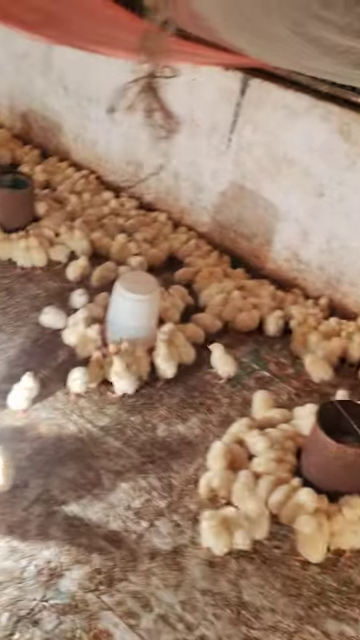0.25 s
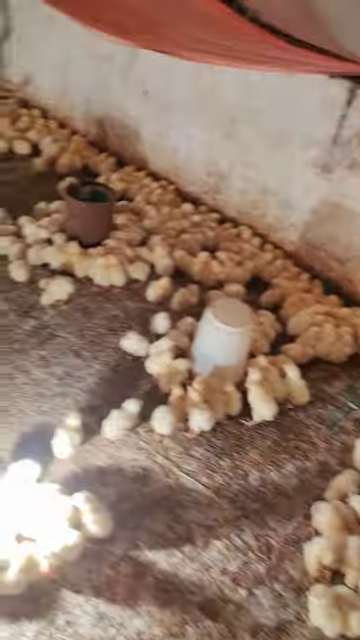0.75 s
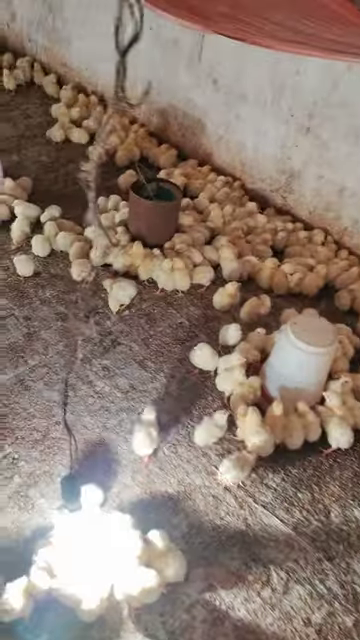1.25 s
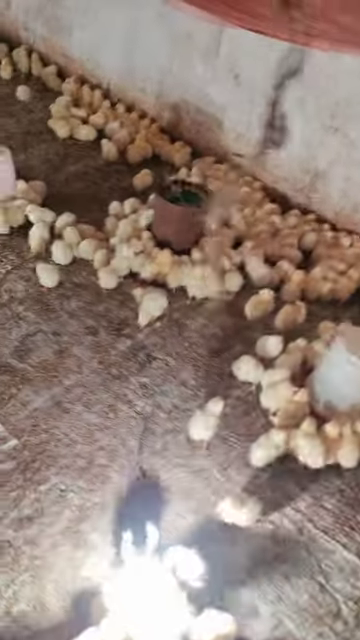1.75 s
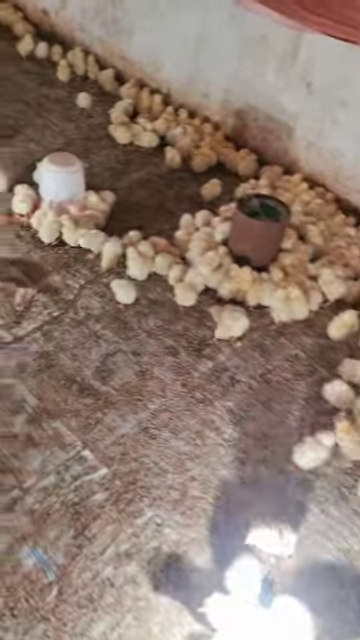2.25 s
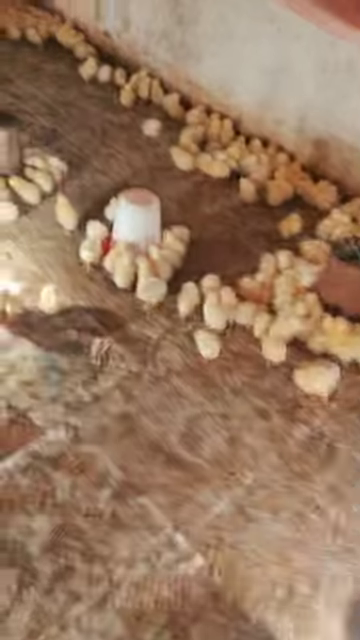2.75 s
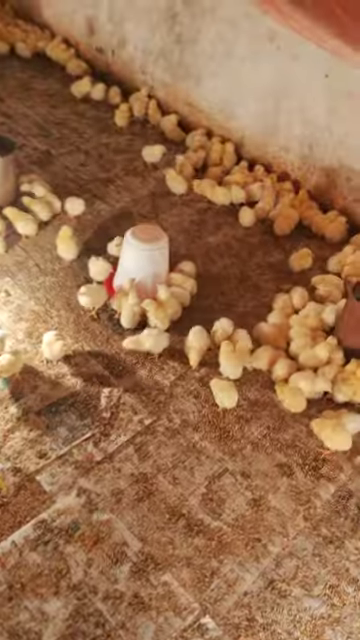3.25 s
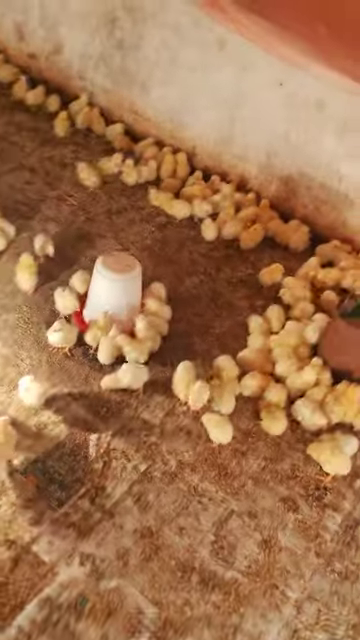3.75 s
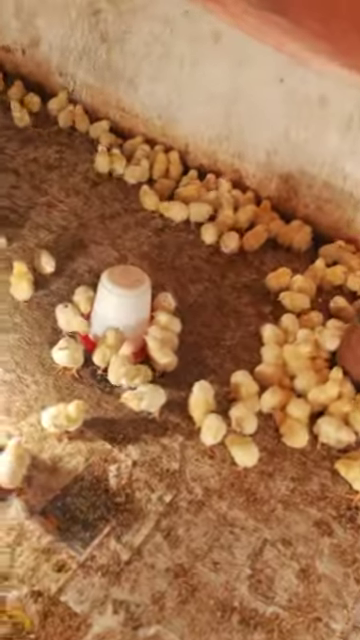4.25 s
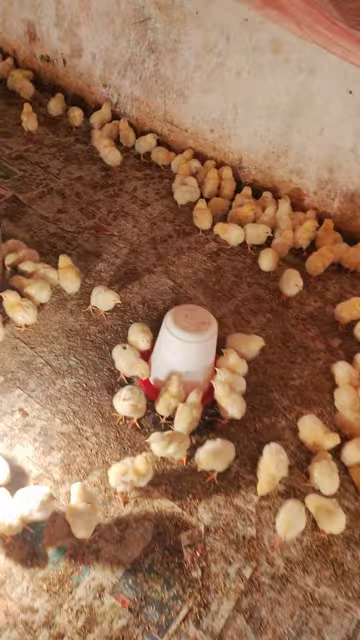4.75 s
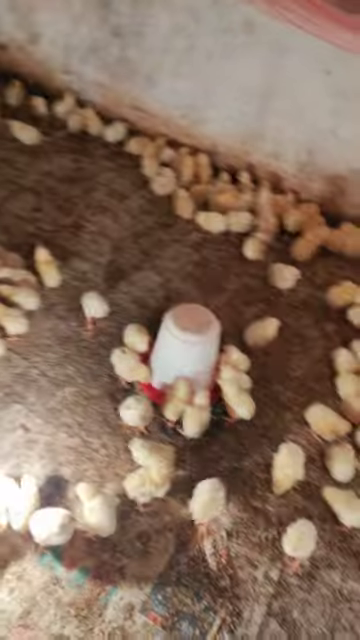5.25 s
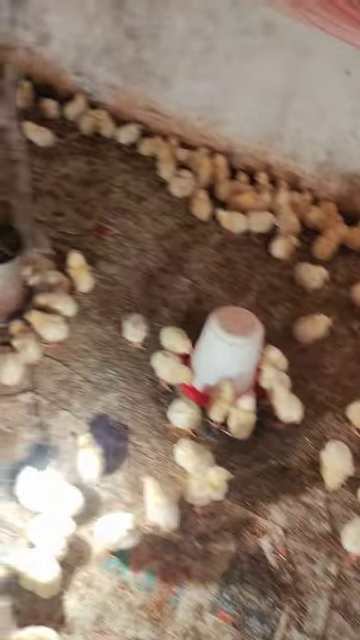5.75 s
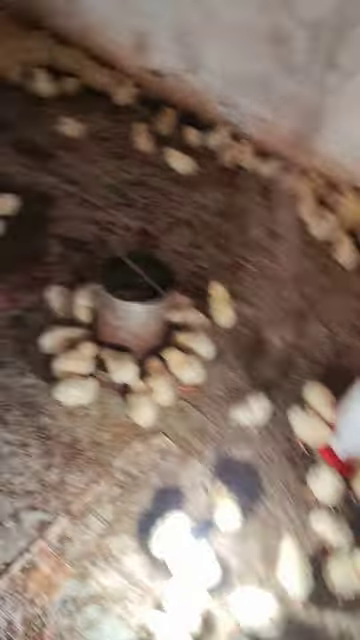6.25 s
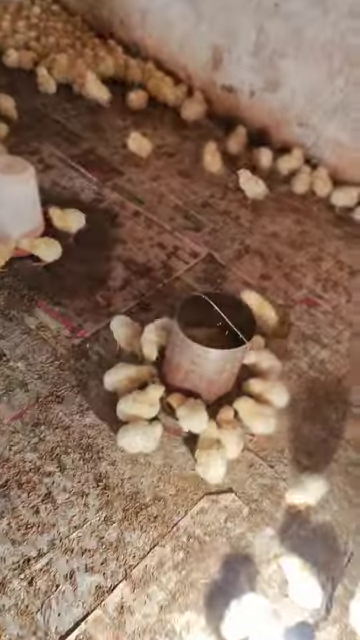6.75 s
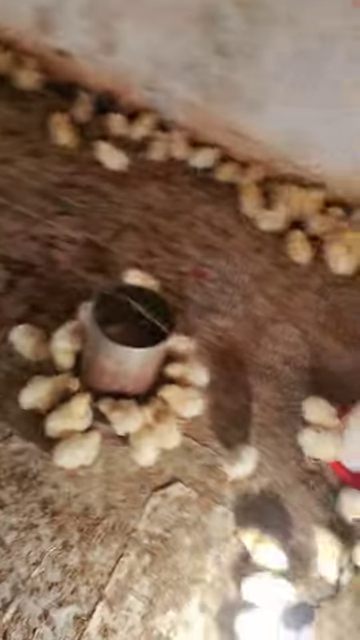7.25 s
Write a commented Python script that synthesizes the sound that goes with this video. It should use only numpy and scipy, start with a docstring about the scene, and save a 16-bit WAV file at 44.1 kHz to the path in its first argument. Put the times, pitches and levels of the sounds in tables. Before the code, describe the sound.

Young chicks cheep without a break, far ones blurred by hard walls, near ones sharp and slightly left. Early calls are soft and scattered; from about two seconds a single chick cries repeatedly, loudest between four and six seconds, then a little weaker. Faint tapping, a few dry ticks, dull floor scuffs and hissing cloth lie underneath, heard on a phone carried through the shed.

```python
"""Hundreds of young chicks peep in a plastered shed, heard close up on a phone with two microphone ports.
One chick's falling cries stand out; they grow strongest past the middle of the scene and then ease.
Each call is a gliding whistle that reaches the ports directly and by bounces off floor and walls.
Under it lie a low room noise, light pecks, a few ticks and scuffs, and clothing that rustles at each stride."""
import sys
import numpy as np
from scipy import signal
from scipy.fft import rfft, irfft, next_fast_len
from scipy.io import wavfile

SR = 44100
rng = np.random.default_rng(int(sys.argv[2]) if len(sys.argv) > 2 else 0)


def unload_wav(signal):
    """Save mono or channel-first audio to the path in sys.argv[1] as 16-bit WAV at rate SR, clipped to [-1, 1]."""
    wavfile.write(
        sys.argv[1],
        SR,
        np.round(np.clip(np.atleast_2d(signal).T, -1, 1) * 32767).astype(np.int16),
    )


N = 330309
T = np.arange(N) / SR
ARCH_TOP = .4  # share of an arched call spent rising


def crying_chick():
    """One chick's loud falling cries, with strong bounces from floor and walls."""
    # cries: (start [s], length [s], base pitch [Hz], relative level [dB])
    peep_rows = [(2.01, .08, 3280, -27.5), (2.335, .068, 3400, -22), (2.685, .092, 3380, -19.5),
                 (3.275, .115, 3470, -21.5), (3.655, .115, 3450, -20.5), (4.113, .105, 3540, -14),
                 (4.521, .11, 3520, -14.5), (5.04, .11, 3470, -14.5), (5.45, .092, 3500, -20),
                 (5.867, .115, 3470, -14.5), (6.31, .108, 3420, -16), (6.707, .115, 3490, -17.5),
                 (7.326, .09, 3360, -18)]
    return chick(peep_rows, peep, octave_db=-28.5, third_db=-32.5, echo_db=-4, pan_db=1.8)


def peep(u):
    """A cry starts high, flat and soft and is loudest on the shelf: pitch ratio, gain."""
    ratio = sag(u, lift=.195, lift_share=.29, slide=.14, drop=.27, crest=.09)
    return ratio, swell(u, attack=0.4, release=0.32, start_db=-21.5, end_db=-10.5)


def cheeping_chicks():
    """Soft falling cheeps close by."""
    # cheeps: (start [s], length [s], base pitch [Hz], relative level [dB])
    cheep_rows = [(.02, 0.06, 3300, -33.5), (.702, .058, 3570, -34.5), (.97, 0.071, 3350, -34),
                  (1.205, 0.042, 3450, -29.5), (1.37, 0.041, 3270, -42), (1.535, 0.032, 2970, -31.5),
                  (1.625, 0.052, 3075, -32.5), (1.83, 0.062, 3250, -29.5), (1.935, 0.036, 2890, -31),
                  (2.26, 0.048, 3224, -30), (2.31, 0.096, 3600, -27), (2.467, 0.038, 3290, -28.5),
                  (3.038, 0.046, 3360, -27.5), (3.159, 0.033, 3440, -30), (3.808, 0.03, 3210, -20),
                  (5.296, 0.05, 3265, -32), (5.74, 0.045, 2900, -35.5), (6.02, 0.11, 3600, -35),
                  (6.12, 0.068, 2940, -39), (6.59, 0.088, 3390, -31.5), (6.864, 0.04, 3600, -31),
                  (7.29, 0.075, 3800, -23)]
    return chick(cheep_rows, cheep, octave_db=-28, third_db=-36, echo_db=-9.5, pan_db=4.0)


def cheep(u):
    """A shallower fall that keeps its strength almost to the end: pitch ratio, gain."""
    ratio = sag(u, lift=0.01996, lift_share=0.462, slide=.2, drop=0.141)
    return ratio, swell(u, attack=0.091, release=0.16, start_db=0.5, end_db=2.5)


def slurring_chicks():
    """Rising slurs that end in a flick, with clear octaves."""
    # slurs: (start [s], length [s], base pitch [Hz], relative level [dB])
    slur_rows = [(2.166, 0.11, 3790, -34), (2.536, 0.069, 3510, -31), (2.972, 0.078, 3620, -27.5),
                 (3.239, 0.082, 3750, -25.5), (3.495, 0.068, 3680, -20.5), (3.714, 0.088, 3800, -27),
                 (4.285, 0.079, 3700, -25), (4.83, 0.083, 3700, -39), (5.363, 0.072, 3740, -27.5),
                 (5.652, 0.068, 3500, -26), (5.934, 0.096, 3650, -28.5), (6.195, 0.099, 3655, -26)]
    return chick(slur_rows, slur, octave_db=-24, third_db=-29, echo_db=-12.5, pan_db=3.0)


def slur(u, rise=0.159, flick=0.15):
    """A slow rise that fades in an upward flick: pitch ratio, gain."""
    ratio = 1 + rise * (u - .45) + flick * hump(u, at=.83, width=0.1333)
    return ratio, swell(u, attack=0.24, release=0.25, start_db=-10, end_db=-22)


def pipping_chicks():
    """Quick up-and-down pips, nearly pure in tone."""
    # pips: (start [s], length [s], top pitch [Hz], relative level [dB])
    pip_rows = [(.26, 0.054, 4720, -30), (.364, 0.039, 4650, -38), (.937, 0.085, 5210, -41),
                (1.16, .075, 4820, -36), (1.256, 0.05, 5060, -33.5), (1.416, .065, 4880, -29),
                (1.72, .056, 5050, -33), (1.895, 0.066, 4850, -28.5), (2.749, 0.062, 4880, -29.5),
                (3.917, 0.061, 4780, -30.5), (4.6, 0.049, 4730, -26.5), (5.135, 0.059, 4700, -29),
                (5.775, 0.035, 4080, -31.5), (6.48, 0.063, 4640, -36), (4.33, .06, 4750, -38),
                (4.875, 0.067, 4610, -30.5), (6.935, .061, 4870, -39)]
    return chick(pip_rows, pip, octave_db=-45, third_db=-40, echo_db=-14, pan_db=6.5)


def pip(u, base=.65):
    """Up to a peak and straight back, weaker on the way down: pitch ratio, gain."""
    ratio = base + (1 - base) * hump(u, at=.5, width=.28)
    return ratio, swell(u, attack=0.14, release=1.0, start_db=-7, end_db=-3)


def squealing_chicks():
    """Low strained calls with a strong octave."""
    # squeals: (start [s], length [s], base pitch [Hz], relative level [dB])
    squeal_rows = [(4.82, 0.066, 2790, -42), (5.472, 0.078, 2770, -37), (6.06, 0.071, 2775, -31),
                   (6.606, .074, 2840, -26.5), (7.257, 0.073, 2855, -27)]
    return chick(squeal_rows, squeal, octave_db=-7.5, third_db=-41, echo_db=-14.5, pan_db=5.5)


def squeal(u):
    """A low fall, pressed hardest in the middle: pitch ratio, gain."""
    ratio = sag(u, lift=.12, lift_share=.17, slide=.13, drop=.05, pivot=.55)
    return ratio, swell(u, attack=0.59, release=0.44, start_db=-8, end_db=-8)


def steady_caller(length=.086):
    """One chick repeats a high arched call at an easy, slightly drifting beat."""
    # its beat: (time [s], time to its next call [s])
    arch_beat = [(1.565, .279), (2.69, .279), (3.25, .291), (4.1, .274), (4.66, .267), (5.75, .289),
                 (7.0, .289)]
    # its voice: (time [s], top pitch [Hz], relative level [dB])
    arch_voice = [(1.57, 5260, -35), (1.85, 5550, -34), (3.25, 5750, -33), (4.1, 5360, -36.5),
                  (4.66, 5580, -40), (5.2, 5600, -44), (5.75, 5490, -40), (6.9, 5520, -38)]
    times, hz, db = np.transpose(arch_voice)
    arch_rows, s = [], arch_beat[0][0]
    while s < arch_beat[-1][0]:
        start = s - ARCH_TOP * length  # the top of the arch falls on the beat
        arch_rows.append((start, length, np.interp(s, times, hz), np.interp(s, times, db)))
        s += np.interp(s, *np.transpose(arch_beat))
    return chick(arch_rows, arch, octave_db=-34, third_db=-40, echo_db=-9, pan_db=8)


def arch(u, rise=.18, fall=0.124):
    """A rounded arch, steeper on the way up: pitch ratio, gain."""
    up = rise * (1 - u / ARCH_TOP) ** 2
    down = fall * ((u - ARCH_TOP) / (1 - ARCH_TOP)) ** 2
    bend = np.where(u < ARCH_TOP, up, down)
    return 1 - bend, swell(u, attack=0.56, release=0.65, start_db=-5, end_db=-9)


def sag(u, lift, lift_share, slide, drop, pivot=.66, crest=0):
    """Pitch sinks from a tense crest to a sloping shelf, then drops as the air runs out."""
    return 1 + lift * hump(u, crest, lift_share) + slide * (pivot - u) - drop * u ** 10


def hump(u, at, width):
    """A brief tightening of the syrinx."""
    return np.exp(-((u - at) / width) ** 2)


def swell(u, attack, release, start_db, end_db):
    """Gain that moves from start_db to 0 dB and on to end_db; attack and release are shares of the call."""
    rise = np.clip(1 - u / attack, 0, 1)
    fall = np.clip(1 - (1 - u) / release, 0, 1)
    return undb(start_db * rise + end_db * fall)


def chick(rows, gesture, octave_db, third_db, echo_db, pan_db, brighten=0.43):
    """The nearby calls of one kind; softer calls have a weaker third harmonic."""
    out = np.zeros((2, N))
    loudest = max(row[3] for row in rows)
    for s, length, hz, db in rows:
        dull_db = brighten * (db - loudest)
        call = whistle(gesture, length, hz, octave_db, third_db + dull_db)
        add(out, s, paths(call, echo_db) * undb(db))
    return out * sides(pan_db)


def whistle(gesture, length, hz, octave_db, third_db, waver=0.007, flutter_db=0.8):
    """The syrinx: a gliding tone that wavers a little in pitch and level, with overtones."""
    # overtones on their way past the beak and the ports: (frequency [Hz], gain [dB])
    overtone_colour = [(5000, 11), (7200, 4), (8500, -8.5), (9500, 14), (10300, 13), (11200, -22),
                       (15000, -1)]
    u = np.linspace(0, 1, max(int(length * SR), 512))  # share of the call elapsed
    ratio, gain = gesture(u)
    turns = rng.standard_normal(size=(2, 28))
    wobble, flutter = (np.interp(u, np.linspace(0, 1, len(c)), c) for c in turns)
    pitch = hz * ratio * (1 + waver * wobble)
    phase = 2 * np.pi * np.cumsum(pitch) / SR
    tone = np.sin(phase)
    for k, over_db in enumerate((octave_db, third_db), 2):
        strength = undb(over_db) * colour_at(k * pitch, overtone_colour)
        audible = k * pitch < SR / 2
        tone += strength * audible * np.sin(k * phase)
    fade = np.minimum(1, 20 * np.minimum(u, 1 - u))
    return np.sqrt(2) * tone * fade * gain * undb(flutter_db * flutter)


def paths(x, echo_db, latest_s=.016, port_s=.0004, left_lead_s=.00034, bearing_s=.00007):
    """Direct sound, first at the left port, plus four floor and wall bounces that beat against the glide."""
    out = np.zeros((2, len(x) + SR // 30))
    bounce = x * undb(echo_db)
    add(out[:1], 0, x)
    add(out[1:], left_lead_s + bearing_s * rng.standard_normal(), x)
    for late, left, right in rng.random(size=(4, 3)):
        add(out[:1], late * latest_s + left * port_s, bounce)
        add(out[1:], late * latest_s + right * port_s, bounce)
    # each port keeps the energy of the call itself
    return out * np.sqrt(np.sum(x ** 2) / np.sum(out ** 2, axis=1, keepdims=True))


def scatter(x, beam_hz=6500, direct=0.41):
    """Overtones are beamed away from the phone, so much of them arrives late, scattered by floor and wall."""
    high = signal.sosfiltfilt(signal.butter(4, beam_hz, "high", fs=SR, output="sos"), x)
    late = undb(-3.5) * shed(high, t60_s=0.042, gap_s=0.0066)
    return x - (1 - direct) * high + late


def flock(count, scatter_db, echo_db, spread, cheep_hz=3150, pip_hz=4050, slur_hz=3250,
          length_s=.056, pan_db=3.0):
    """Many chicks, evenly busy: mostly cheeps, some pips and slurs, varied in pitch, length, level and side."""
    # level of the whole flock: (time [s], relative level [dB])
    flock_level = [(0.0, -37), (2.23, -39.5), (2.44, -37), (7.26, -38.5), (7.49, -36.5)]
    out = np.zeros((2, N))
    kinds = [(cheep, cheep_hz), (pip, pip_hz), (cheep, cheep_hz), (slur, slur_hz), (cheep, cheep_hz)]
    variety = np.clip(rng.standard_normal((count, 4)), -2, 2)
    for k, (pitch, stretch, near, side) in enumerate(variety):
        gesture, hz = kinds[k % len(kinds)]
        length = length_s * np.exp(.22 * stretch)
        call = whistle(gesture, length, hz * np.exp(spread * pitch), -24, -54)
        s = (k + 2 * rng.random()) / count * (N / SR + length_s) - length_s
        add(out, s, paths(call, echo_db) * undb(scatter_db * near) * sides(pan_db + 2 * side))
    return unit(out) * undb(curve(flock_level))


def shed(x, t60_s, gap_s=0.0093):
    """Dense echoes between the plastered walls and the cloth roof, building up and dying by 60 dB in t60_s."""
    t = np.arange(SR * 3 // 4) / SR
    decay = np.exp(-np.log(1000) * t / t60_s)
    build_up = 1 - np.exp(-(t / gap_s) ** 2)
    tail = rng.standard_normal((2, len(t))) * decay * build_up
    tail /= np.sqrt(np.sum(tail ** 2, axis=1, keepdims=True))
    return signal.fftconvolve(x, tail, axes=1)[:, :N]


def rustle(count=150, grain_s=0.0037, grain_db=12, scatter_db=12, flicker_db=5.0,
           left_db=4, right_db=0, right_swing=0.66, rise=0.45, rest_db=-47.5):
    """Clothing hisses with each stride, flickering and crackling; it swells most at the left port."""
    # cloth swells, about once a stride: (time of its height [s], length [s], relative level [dB])
    rustle_rows = [(0.907, 0.94, -38), (1.65, 0.62, -36.5), (2.76, 0.86, -42), (3.26, 0.15, -33),
                   (3.6, 1, -41.5), (4.597, 0.85, -41.5), (5.316, 0.74, -37), (5.852, 0.73, -59),
                   (6.36, 0.4, -42), (7.153, 0.69, -38.5)]
    # cloth at the left port: (frequency [Hz], relative density [dB per Hz])
    left_colour = [(1000, -6.5), (4000, 5.5), (7000, -6.5), (9500, -10), (12000, -2), (15000, 3)]
    # the duller right port, which faces away: (frequency [Hz], relative density [dB per Hz])
    right_colour = [(1000, -3), (4000, 8.5), (6500, -0.5), (8500, 3), (10500, -3.5), (15000, -6.5)]
    grains = np.zeros(N)
    chance = rng.random((count, 2))
    grains[(chance[:, 0] * (N - 1)).astype(int)] = undb(grain_db - scatter_db * chance[:, 1])
    crackle = signal.lfilter([1], [1, -np.exp(-1 / (grain_s * SR))], grains)
    motion = 1  # level relative to the rest between strides
    for s, length, db in rustle_rows:
        corners = [s - rise * length, s, s + (1 - rise) * length]
        motion = motion + undb(db - rest_db) * np.interp(T, corners, [0, 1, 0])

    def grit():
        """Flicker drawn anew for each port, plus the shared crackle."""
        return unit(undb(flicker_db * wander(size=190)) + crackle)

    left = noise(left_colour)[0] * undb(left_db) * grit() * motion
    right = noise(right_colour)[0] * undb(right_db) * grit() * motion ** right_swing
    return np.array([left, right]) * undb(rest_db)


def pecks(count=110, peck_db=-44, scatter_db=6.0, peck_hz=950, ring_s=0.011):
    """Beaks and feet tap lightly on the floor and the feeders: short bursts of resonant noise."""
    out, t = np.zeros((2, N)), np.arange(SR // 20) / SR
    for near, pitch, side in np.clip(rng.standard_normal((count, 3)), -2, 2):
        hz = peck_hz * np.exp(.6 * pitch)
        burst = band(band(rng.standard_normal((2, len(t))), hz, hz), hz, hz)
        tap = unit(burst) * np.exp(-t / ring_s)
        add(out, rng.random() * N / SR, tap * undb(peck_db + scatter_db * near) * sides(3 * side))
    return out


def ticks(decay_s=0.009, pan_db=5):
    """Small dry ticks: bands of noise that die at once."""
    # ticks: (time [s], relative level [dB], pitch [Hz], width [Hz])
    tick_rows = [(0.722, -36, 11000, 9000), (2.903, -33, 2000, 2500), (3.257, -40, 11000, 6000),
                 (4.787, -29, 2020, 594), (5.702, -40, 10100, 8000), (5.83, -33.5, 6540, 8000),
                 (5.882, -34, 7500, 11000)]
    out, t = np.zeros((2, N)), np.arange(SR // 20) / SR
    for s, db, hz, width in tick_rows:
        burst = unit(band(rng.standard_normal((2, len(t))), hz, width))
        add(out, s, burst * np.exp(-t / decay_s) * undb(db) * sides(pan_db))
    return out


def scuffs():
    """Dull scuffs on the floor: centred bands of noise that swell and fade."""
    # scuffs: (start [s], length [s], relative level [dB], pitch [Hz])
    scuff_rows = [(3.149, 0.29, -47.5, 457), (3.485, 0.16, -44, 386), (5.02, .34, -42.5, 195),
                  (5.797, 0.18, -52, 477)]
    out = np.zeros((2, N))
    for s, length, db, hz in scuff_rows:
        rub = unit(band(rng.standard_normal(SR), hz, hz))[:int(length * SR)]
        add(out, s, rub * np.hanning(len(rub)) * undb(db))
    return out


def background(room_db=-40.0, alike_hz=480, bass_side=0.31, waver_db=0.98):
    """Room noise of slightly wavering level, much alike at both ports in the bass."""
    # room noise: (frequency [Hz], relative density [dB per Hz])
    room_colour = [(10, 16), (42, 10), (100, 2), (300, 1.5), (700, 0), (1600, -3.5), (2600, 3.5),
                   (5000, -10), (7800, -11), (10000, -15), (15500, -16)]
    mid, side = noise(room_colour)
    high_pass = signal.butter(2, alike_hz, "high", fs=SR, output="sos")
    side = bass_side * side + signal.sosfilt(high_pass, noise(room_colour)[0])
    return unit(np.array([mid + side, mid - side])) * undb(room_db + waver_db * wander(size=90))


def undb(db):
    """Amplitude gain of a level in dB."""
    return 10 ** (np.asarray(db) / 20)


def unit(x):
    """Scale to an RMS of one."""
    return x / np.sqrt(np.mean(x ** 2) + 1e-20)


def sides(pan_db):
    """Left and right gains of a level difference (positive is left), at constant power."""
    return unit(undb(np.array([[pan_db], [-pan_db]]) / 2))


def curve(rows):
    """Straight lines through (time, value) rows over the whole scene."""
    return np.interp(T, *np.transpose(rows))


def wander(size):
    """A random curve through `size` evenly spaced points over the whole scene."""
    return np.interp(T, np.linspace(0, N / SR, size), rng.standard_normal(size))


def colour_at(hz, points):
    """Gain of a (Hz, dB) colour, interpolated over log frequency."""
    f, db = np.transpose(points)
    return undb(np.interp(np.log(hz + 1), np.log(f), db))


def noise(points):
    """Two unrelated noises of one colour."""
    n = next_fast_len(N, True)
    spectrum = rfft(rng.standard_normal((2, n)))
    gain = colour_at(np.arange(n // 2 + 1) * SR / n, points)
    return unit(irfft(spectrum * gain, n)[:, :N])


def band(x, hz, width):
    """One resonance."""
    hz = min(hz, .45 * SR)
    return signal.lfilter(*signal.iirpeak(hz, hz / min(width, .4 * SR), SR), x)


def add(out, s, x):
    """Mix a short sound in at time s."""
    i = int(s * SR)
    a, b = max(i, 0), min(i + x.shape[-1], N)
    if b > a:
        out[:, a:b] += x[..., a - i:b - i]


def scene():
    """Near callers, their neighbours, and the far flock heard only through the shed's echoes."""
    calls = (crying_chick() + cheeping_chicks() + pipping_chicks()
             + slurring_chicks() + squealing_chicks() + steady_caller())
    near = scatter(calls) + ticks() + scuffs() + pecks()
    near_echoes = undb(-6.5) * shed(near, t60_s=0.23)
    neighbours = undb(0.5) * flock(count=280, scatter_db=1.3, echo_db=-15.5, spread=.085)
    far = undb(3.5) * flock(count=360, scatter_db=0.5, echo_db=-8.0, spread=0.13)
    return near + near_echoes + neighbours + shed(far, t60_s=0.31) + background() + rustle()


def record(dry):
    """The phone cuts the top steeply above 15650 Hz."""
    return signal.sosfilt(signal.ellip(10, .2, 70, 15650, fs=SR, output="sos"), dry)


dry = scene()
out = record(dry)
unload_wav(out)
```